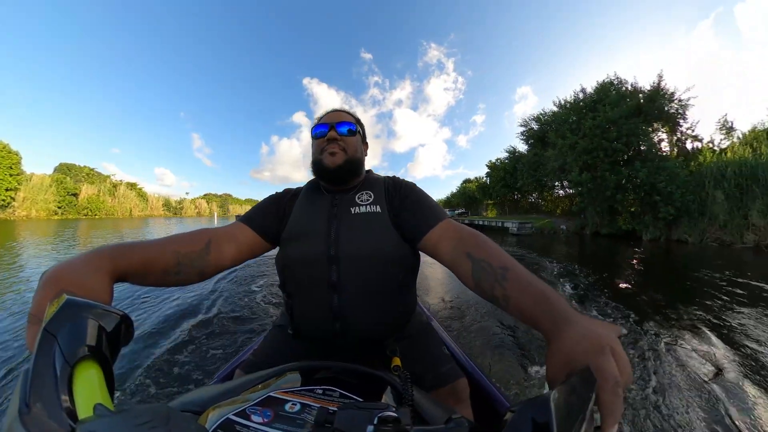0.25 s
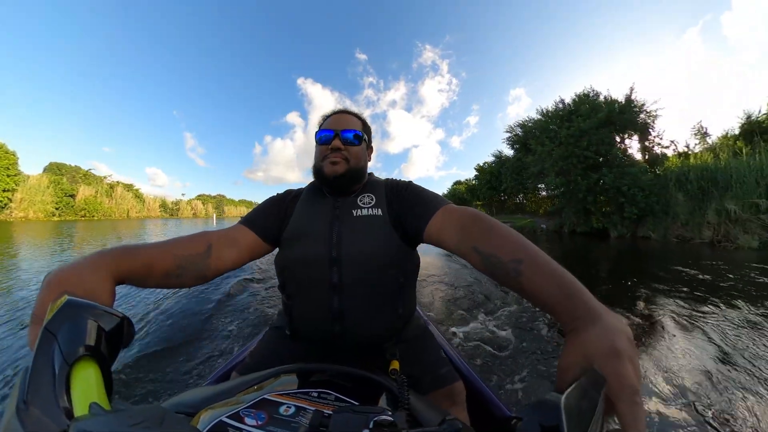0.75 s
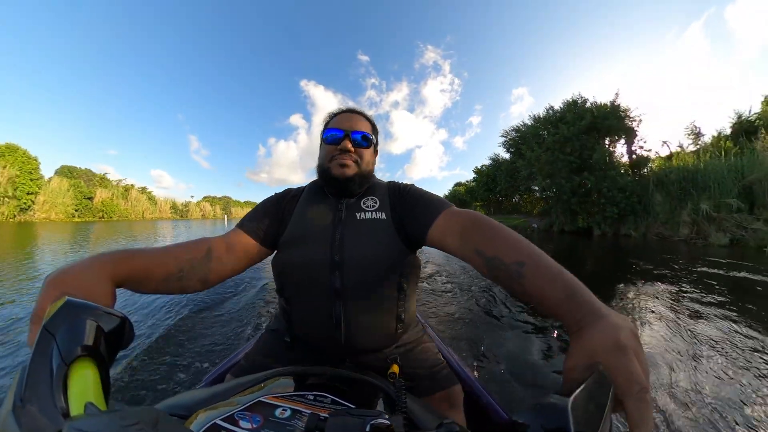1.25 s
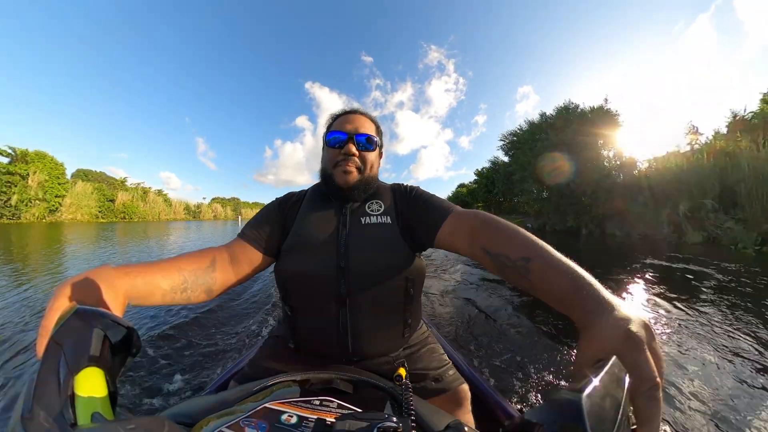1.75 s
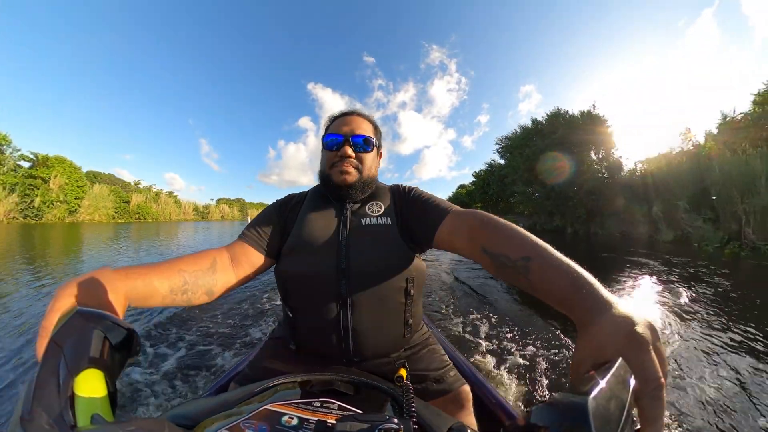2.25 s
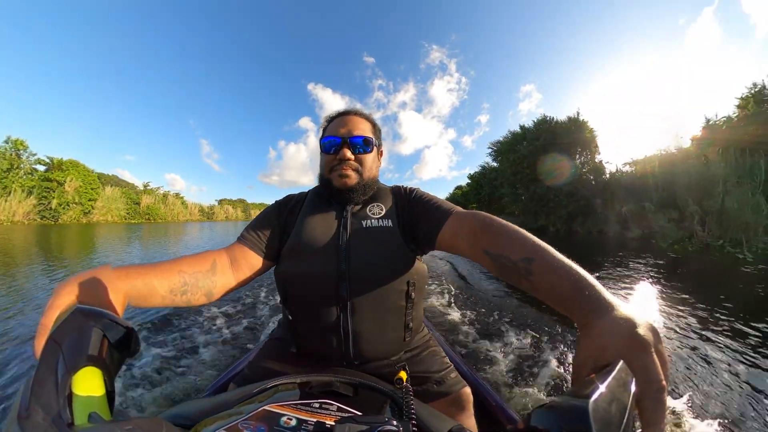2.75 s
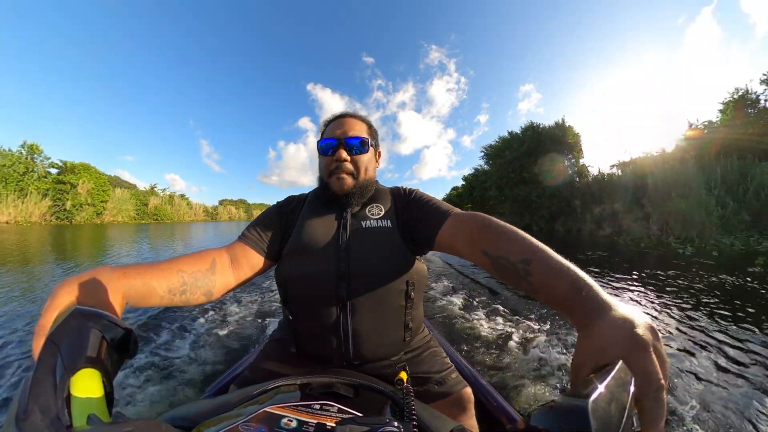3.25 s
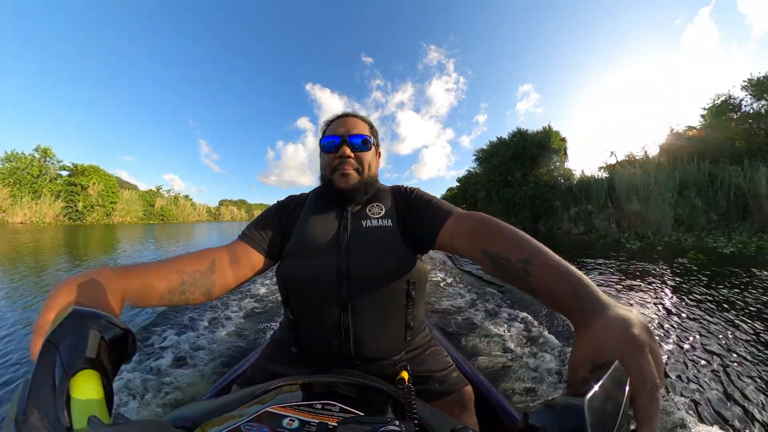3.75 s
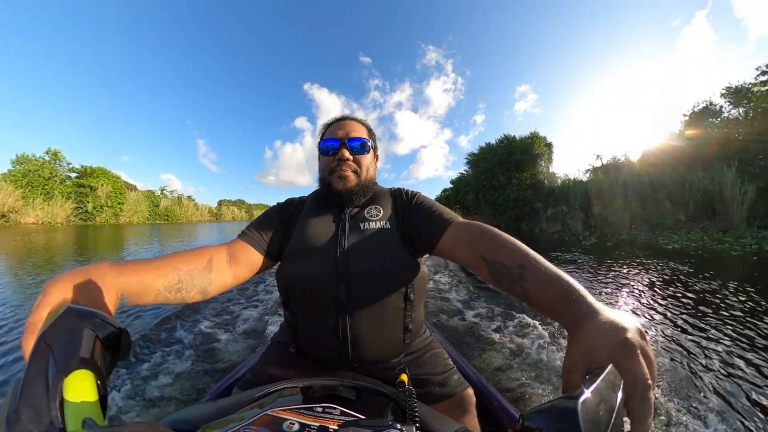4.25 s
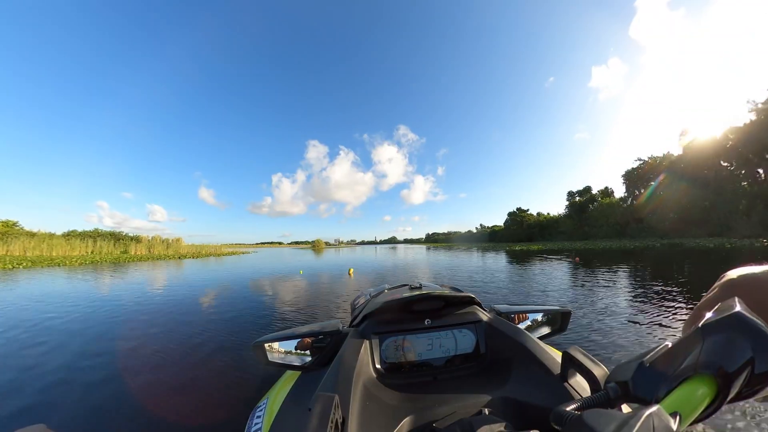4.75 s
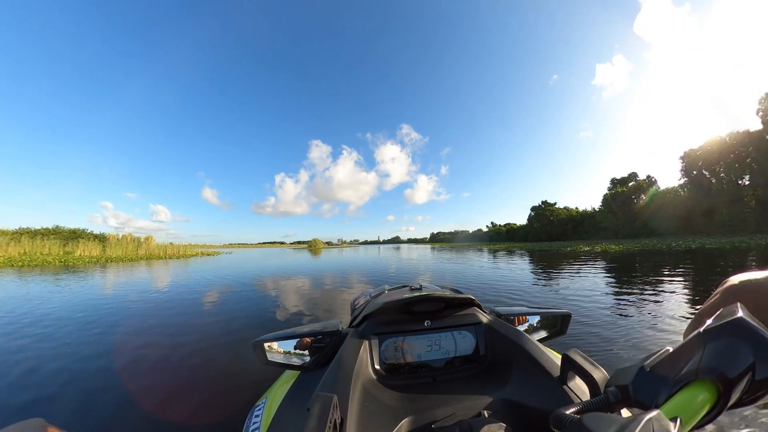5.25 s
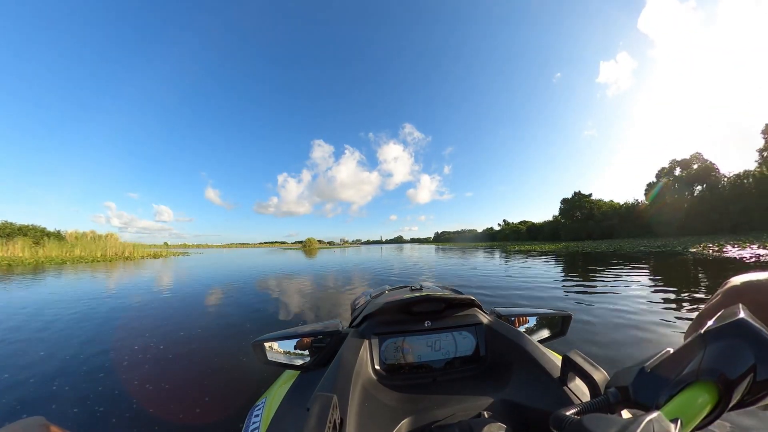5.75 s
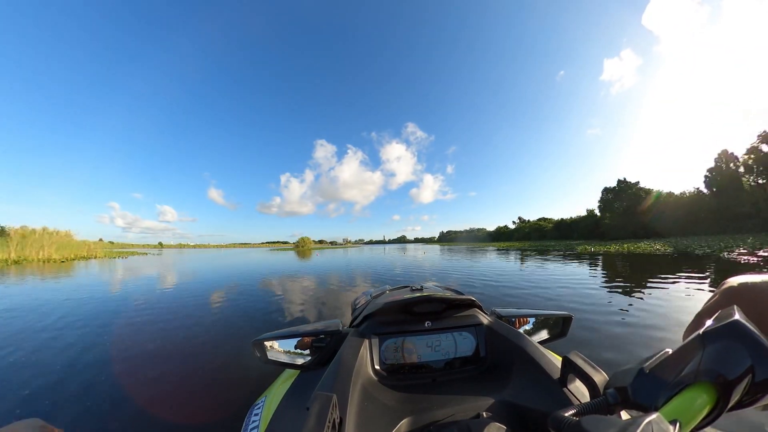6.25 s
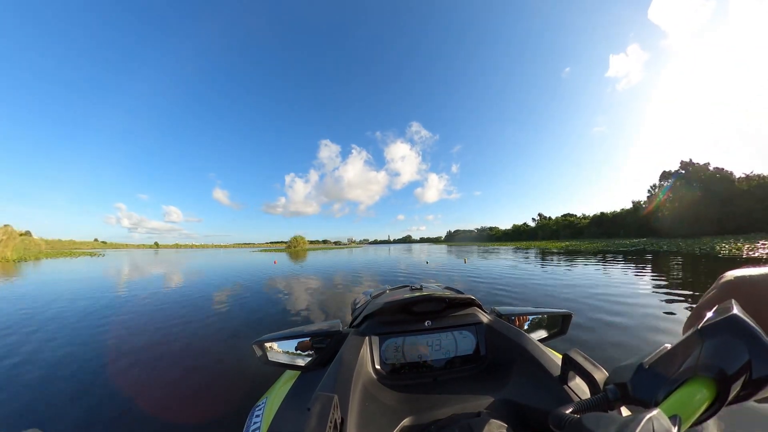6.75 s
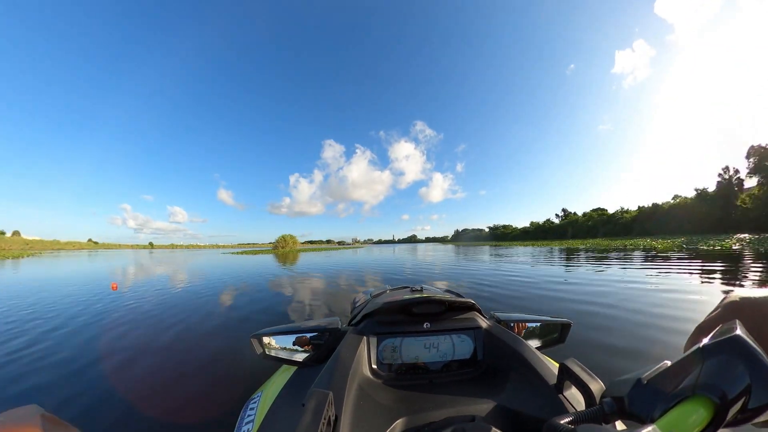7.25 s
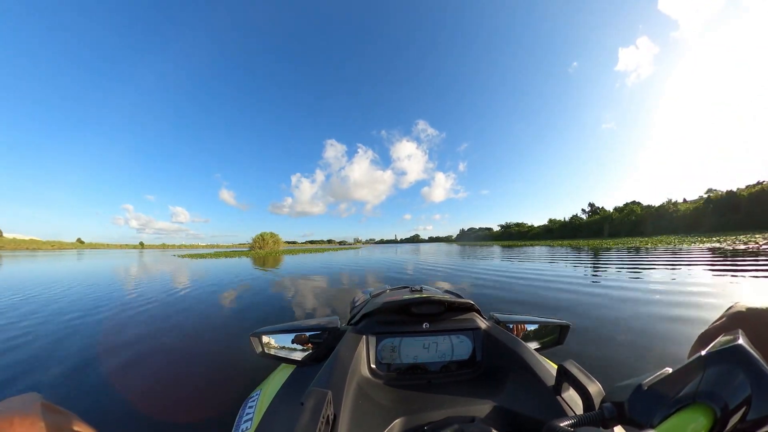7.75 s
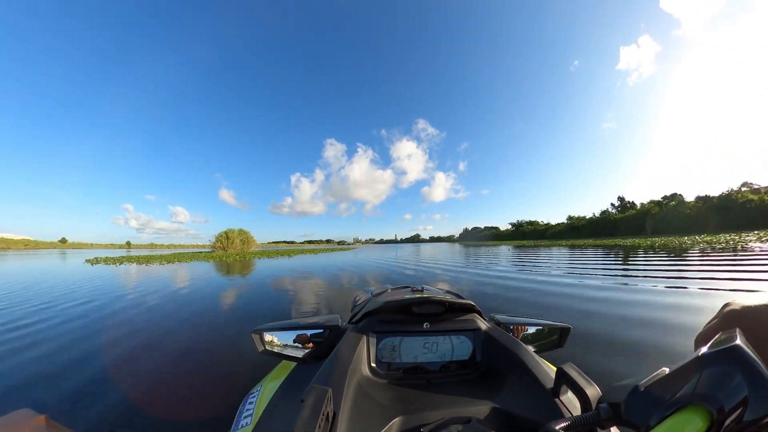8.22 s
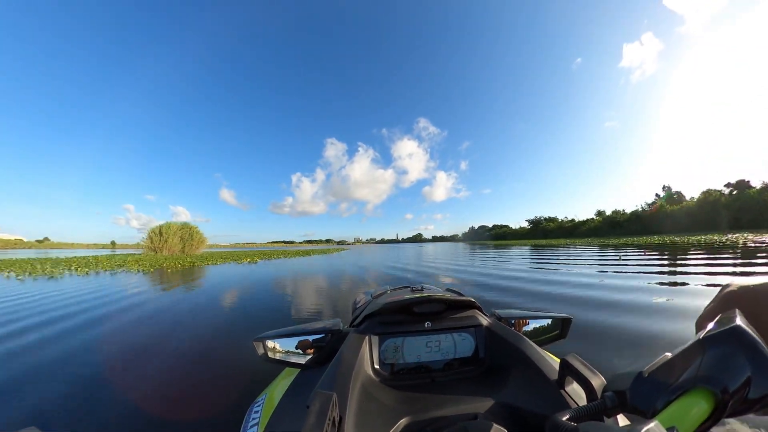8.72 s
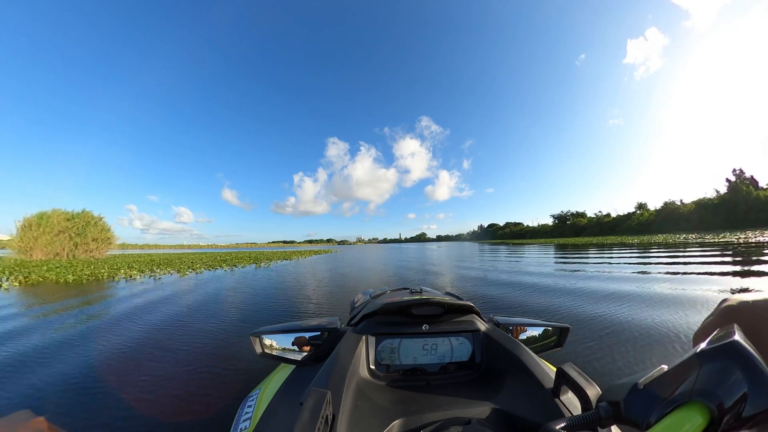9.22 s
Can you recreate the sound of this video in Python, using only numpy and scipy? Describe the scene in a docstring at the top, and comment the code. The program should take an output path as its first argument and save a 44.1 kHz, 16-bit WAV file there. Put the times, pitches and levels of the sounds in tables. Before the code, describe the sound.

A supercharged jet ski is heard from on board on a lake. For the first 3.7 seconds it cruises with a low, lumpy, burbling drone and a faint, warbling high whine, over hull rumble, churning water and slowly growing spray hiss. From about 3.7 seconds the engine rises in pitch with a push of throttle. At about 4.4 seconds a short click cuts this off, and the engine is back at cruising pitch with a smoother hum, while low, gusty wind buffets the microphone. Water keeps rushing and hissing. Near 6.9 seconds the engine steps up in pitch, then climbs steeply from about 7.6 to 8.3 seconds, with a surge of water and spray around 8.2 seconds. It then holds a loud, higher, steady drone at full speed, the whine thin and rough above it, until the end at about 9.5 seconds.

```python
"""Supercharged jet ski on a lake.

Heard on board in two scenes: facing astern, then, after a click, facing the bow. Exhaust and jet pump
drone on multiples of the engine cycle; the supercharger whines far above, warbling with the crank.
The craft cruises, then opens up to full speed. Water churns and spray hisses throughout.
Astern the hull rumbles; facing the bow, wind buffets the microphone."""
import sys
import numpy as np
from scipy import signal
from scipy.fft import rfft, irfft, next_fast_len
from scipy.io import wavfile
from scipy.ndimage import uniform_filter1d

SR = 44100
rng = np.random.default_rng(int(sys.argv[2]) if len(sys.argv) > 2 else 0)


def store_pcm(level_fs):
    """Save levels as 16-bit WAV."""
    pcm = np.round(np.clip(level_fs, -1, 1) * 32767).astype(np.int16)
    wavfile.write(sys.argv[1], SR, np.atleast_2d(pcm).T)


N = 418068
T = np.arange(N) / SR


def undb(db):
    """Decibels to gain."""
    return 10 ** (np.asarray(db) / 20)


def unit(x):
    """Scale to rms 1."""
    return x / np.sqrt(np.mean(x ** 2))


def curves(table):
    """Each column of a timed table at every sample."""
    times_s, *columns = np.transpose(table)
    return [np.interp(T, times_s, column) for column in columns]


def colour(x, spectrum):
    """Filter by (f/Hz, level/dB) points; rms 1."""
    hz, db = np.transpose(spectrum)
    size = next_fast_len(N, real=True)
    bins_hz = np.maximum(np.fft.rfftfreq(size, 1 / SR), 1)
    gain = undb(np.interp(np.log(bins_hz), np.log(hz), db, left=-np.inf, right=-np.inf))
    return unit(irfft(rfft(x, size) * gain, size)[:N])


def drift(rate_hz):
    """Smooth random drift, about rate_hz new values a second; rms 1."""
    size = max(int(SR / rate_hz), 2)
    held = np.repeat(rng.standard_normal(N // size + 2), size)
    start = rng.integers(size)
    smooth = uniform_filter1d(uniform_filter1d(held, size), size // 2)
    return unit(smooth[start:start + N])


def order_gains(table, speeds_hz, cycle_hz):
    """Yield each order (multiple of the cycle rate) and its gain at the running speed."""
    for order, *db in table:
        yield round(order), undb(np.interp(cycle_hz, speeds_hz, db))


def drone(cycle_phase, cycle_hz, resonances, order, swell_db, flutter, scatter):
    """Main exhaust note: swells as its pitch meets the pipe resonances; firings vary in strength."""
    level_db = np.interp(order * cycle_hz, *np.transpose(resonances)) + swell_db * drift(5)
    firing = 1 + flutter * drift(12) + scatter * drift(130)
    return undb(level_db) * firing * np.sqrt(2) * np.sin(order * cycle_phase)


def overtones(cycle_phase, partials, waver_db, smear_rad):
    """Further engine notes; water washing over the exhaust shifts the level and phase of each."""
    out = 0
    for order, gain in partials:
        phase = order * cycle_phase + rng.uniform(0, 2 * np.pi) + smear_rad * drift(14)
        out = out + gain * undb(waver_db * drift(8)) * np.sqrt(2) * np.sin(phase)
    return out


# Exhaust resonances: f/Hz, level/dB
STERN_PIPE = [(74, -22.5), (77.5, -21), (85, -21), (89, -23.5)]
# Low exhaust notes: t/s, level/dB at orders 6, 8, 9
BURBLE = [(0.0, -36, -30.5, -28.5), (0.9, -38.5, -34.5, -41.5), (1.9, -26.5, -41.5, -38.5),
          (3.0, -31.5, -46, -42.5), (3.76, -34.5, -44, -34.5), (3.86, -33.5, -36, -20.5),
          (4.35, -31, -30, -26)]
# Cycle rates at cruise, part throttle: f/Hz
STERN_SPEEDS_HZ = [25.8, 29.5]
# Exhaust and pump overtones: order, level/dB at each cycle rate
STERN_ORDERS = [(1, -32, -31), (4, -32, -24.5), (5, -37.5, -34.5), (7, -42, -36), (10, -46.5, -41.5),
                (11, -41.5, -54.5), (12, -39, -52), (14, -49, -49.5), (16, -52, -51), (18, -48, -52),
                (20, -47, -54.5), (27, -54.5, -62)]


def stern_engine(cycle_phase, cycle_hz):
    """Exhaust and jet pump astern: a low drone with a lumpy burble."""
    out = drone(cycle_phase, cycle_hz, STERN_PIPE, order=3, swell_db=0.95, flutter=0.06, scatter=0.14)
    burble = zip([6, 8, 9], undb(curves(BURBLE)))
    out += overtones(cycle_phase, burble, waver_db=1.7, smear_rad=0.13)
    partials = order_gains(STERN_ORDERS, STERN_SPEEDS_HZ, cycle_hz)
    return out + overtones(cycle_phase, partials, waver_db=2.0, smear_rad=0.47)


WHINE_ORDER = 105  # whine periods per engine cycle


def supercharger(cycle_phase, cycle_hz, tones, speeds_hz, twist_rad, jitter_rad, hiss, width_hz, gulp):
    """Rotor whine, bent by crank twist, pulsed by intake strokes; turbulence adds hiss round each tone."""
    warble = twist_rad * np.sin(2 * cycle_phase + drift(5.5) / 2)
    rotor_phase = WHINE_ORDER * cycle_phase + warble + jitter_rad * drift(25)
    out = 0
    for harmonic, sideband, *db in tones:
        harmonic, sideband = round(harmonic), round(sideband)
        phase = harmonic * rotor_phase + sideband * 6 * cycle_phase
        band_hz = harmonic * width_hz
        air = drift(band_hz) * np.sin(phase) + drift(band_hz) * np.cos(phase)
        gain = undb(np.interp(cycle_hz, speeds_hz, db))
        out = out + gain * unit(np.sin(phase) + hiss * harmonic * air)
    strokes = np.cos(cycle_phase) + np.sin(2 * cycle_phase) / 2 + np.cos(3 * cycle_phase) / 2
    return out * unit(1 + gulp * strokes)


# Cycle rates: f/Hz
STERN_WHINE_SPEEDS_HZ = [25, 25.33, 28.7, 29.5]
# Supercharger tones: harmonic, sideband, level/dB at each cycle rate
STERN_WHINE = [(1, 0, -68, -55.5, -51, -44), (2, 0, -60, -55.5, -57, -56), (3, 0, -74, -74, -78.5, -84.5)]


def stern_whine(cycle_phase, cycle_hz):
    """Supercharger astern: three warbling rotor harmonics."""
    return supercharger(cycle_phase, cycle_hz, STERN_WHINE, STERN_WHINE_SPEEDS_HZ,
                        twist_rad=0.47, jitter_rad=0.31, hiss=0.77, width_hz=170, gulp=0.13)


# Low rumble spectrum: f/Hz, level/dB
STERN_RUMBLE = [(10, -10.5), (22, -5.5), (50, -2), (120, -1.5), (200, -10.5), (320, -17.5), (600, -45.5)]


def hull_rumble(level_db=-26.5, waver_db=0.9):
    """Low hull noise, wavering slightly."""
    return undb(level_db) * colour(rng.standard_normal(N) * undb(waver_db * drift(11)), STERN_RUMBLE)


def churn(cycle_phase, spectrum, throb, surge_db):
    """Water torn up by the jet, pulsing with the shaft and the three impeller blades."""
    pulsing = 1 + throb * (np.cos(2 * cycle_phase) + np.cos(6 * cycle_phase))
    return colour(rng.standard_normal(N) * pulsing * undb(surge_db * drift(20)), spectrum)


# Spray spectrum: f/Hz, level/dB
SPRAY_SPECTRUM = [(600, -29.5), (1300, 3), (1900, 0), (2500, -3), (3100, -3), (4000, -8), (5000, -11.5),
                  (6300, -15), (7800, -23), (9000, -29.5), (11000, -37), (13000, -45), (16000, -64)]


def spray(drop_db, surge_db):
    """Dense droplets of very unequal size, thrown in sheets."""
    drops = rng.standard_normal(N) * undb(drop_db * rng.standard_normal(N))
    return colour(drops * undb(surge_db * drift(25)), SPRAY_SPECTRUM)


# Churn envelope: t/s, level/dB
STERN_SLOSH = [(0.0, -31), (0.45, -34), (0.85, -31), (2.2, -31.2), (2.65, -33), (3.6, -34.5), (4.35, -32.5)]
# Churn spectrum: f/Hz, level/dB
STERN_CHURN = [(120, -14.5), (260, 3.5), (450, -5.5), (650, -9.5), (1000, -11.5), (1400, -17),
               (1900, -30.5), (4000, -46.5)]


def stern_water(cycle_phase):
    """Churn sloshes, then calms as the hull lifts; spray grows with the wake."""
    slosh_db, = curves(STERN_SLOSH)
    spray_db = np.interp(T, [0, 2.93], [-50.5, -43])
    water = undb(slosh_db) * churn(cycle_phase, STERN_CHURN, throb=0.081, surge_db=0.67)
    return water + undb(spray_db) * spray(drop_db=4.0, surge_db=0.5)


# Fleck peaks: t/s, level/dB
FLECKS = [(1.06, -62), (2.03, -72)]
# Fleck spectrum: f/Hz, level/dB
FLECK_SPECTRUM = [(3000, -12), (7000, -1.5), (10000, -3), (13000, -13)]


def flecks(rise_fall_s=0.014):
    """Short soft spits of fine spray flying past."""
    envelope = sum(undb(db) * np.exp(-np.abs(T - peak_s) / rise_fall_s) for peak_s, db in FLECKS)
    return envelope * colour(rng.standard_normal(N), FLECK_SPECTRUM)


# Second whine harmonic, sets engine speed: t/s, f/Hz
STERN_WHINE_PITCH = [(0.06, 5294), (0.45, 5175), (0.59, 5430), (1.63, 5442), (1.77, 5265), (1.89, 5450),
                     (3.3, 5458), (3.37, 5352), (3.67, 5413), (3.9, 6001), (4.3, 6336)]


def facing_stern():
    """Cruise with a steady low hull rumble, then a first push of throttle."""
    whine_hz, = curves(STERN_WHINE_PITCH)
    cycle_hz = whine_hz / (2 * WHINE_ORDER)
    cycle_phase = 2 * np.pi * np.cumsum(cycle_hz) / SR
    engine = stern_engine(cycle_phase, cycle_hz) + stern_whine(cycle_phase, cycle_hz)
    return engine + hull_rumble() + stern_water(cycle_phase) + flecks()


# Cycle rates at cruise, part throttle, full throttle: f/Hz
BOW_SPEEDS_HZ = [25.6, 29.3, 35.3]
# Exhaust resonances: f/Hz, level/dB
BOW_PIPE = [(148, -19), (152, -17.5), (156, -14.5), (166, -12.5), (170, -18.5), (186, -23.5), (207, -12.3),
            (216, -9.5)]
# Low exhaust notes: t/s, level/dB at orders 8, 12
GROWL = [(4.4, -37, -29.5), (5.25, -26.5, -25.5), (5.75, -27.5, -30), (6.55, -33, -30), (6.9, -41, -42.5),
         (7.2, -39, -31.5), (8.0, -44.5, -38), (8.3, -43.5, -30.5)]
# Muffler gas spectrum: f/Hz, level/dB
MUFFLER_SPECTRUM = [(90, -24.5), (150, -1), (185, -1.5), (225, -1), (255, -15), (340, -32.5)]
# Exhaust and pump overtones: order, level/dB at each cycle rate
BOW_ORDERS = [(4, -38, -30.5, -27), (10, -52.5, -52, -52), (14, -41, -40.5, -48.5), (16, -36.5, -28, -35.5),
              (18, -51.5, -38, -28), (20, -53, -48.5, -49), (24, -58.5, -42, -51), (26, -47, -53.5, -56),
              (28, -56.5, -53.5, -57.5), (30, -51, -55.5, -46), (32, -47.5, -54, -55), (36, -56, -46, -58),
              (42, -61, -44, -56.5), (62, -55.5, -72, -73)]


def bow_engine(cycle_phase, cycle_hz):
    """Exhaust and jet pump heard forward: drone, growl and a roar that grows with gas flow."""
    roar_db = np.interp(cycle_hz, BOW_SPEEDS_HZ, [-34.5, -30, -23])
    swell_db = np.interp(cycle_hz, BOW_SPEEDS_HZ, [0.6, 1.8, 0.7])  # least steady at part throttle
    out = drone(cycle_phase, cycle_hz, BOW_PIPE, order=6, swell_db=swell_db, flutter=0.062, scatter=0.087)
    growl = zip([8, 12], undb(curves(GROWL)))
    out += overtones(cycle_phase, growl, waver_db=0.9, smear_rad=0.11)
    out += undb(roar_db) * colour(rng.standard_normal(N), MUFFLER_SPECTRUM)
    partials = order_gains(BOW_ORDERS, BOW_SPEEDS_HZ, cycle_hz)
    return out + overtones(cycle_phase, partials, waver_db=1.8, smear_rad=0.22)


# Cycle rates: f/Hz
BOW_WHINE_SPEEDS_HZ = [24.6, 25.24, 28.7, 34.34, 36]
# Supercharger tones: harmonic, sideband (rounded, steps of 6 orders), level/dB at each cycle rate
BOW_WHINE = [(1, 1, -68, -67.5, -67.5, -69, -64.5), (2, -1, -83, -79, -72, -67, -68),
             (2, 0, -57, -49, -49, -52.5, -67.5), (2, 1.3, -76, -65.5, -70, -65, -68),
             (2, 2, -91, -89.5, -89, -75, -73), (4, 0.019, -86, -80, -76.5, -120, -120)]


def bow_whine(cycle_phase, cycle_hz):
    """Supercharger heard forward: tones and sidebands, unsteady under full load."""
    blur = np.interp(cycle_hz, BOW_SPEEDS_HZ, [0.28, 0.32, 0.75])
    return supercharger(cycle_phase, cycle_hz, BOW_WHINE, BOW_WHINE_SPEEDS_HZ,
                        twist_rad=0.5, jitter_rad=blur, hiss=blur, width_hz=150, gulp=0.22)


# Wind envelope: t/s, level/dB
BOW_GUSTS = [(4.36, -23.5), (4.8, -17), (6.8, -19.5), (7.55, -15.5), (7.95, -17.5), (8.4, -21),
             (9.48, -22.5)]
# Wind spectrum: f/Hz, level/dB
BOW_WIND = [(10, -20), (22, -5.5), (50, 0.5), (120, -5.5), (200, -9), (280, -15), (600, -32)]


def bow_wind(gust_db=1.4):
    """Eddies buffet the microphone."""
    wind_db, = curves(BOW_GUSTS)
    return undb(wind_db) * colour(rng.standard_normal(N) * undb(gust_db * drift(11)), BOW_WIND)


# Flow past the hull: t/s, level/dB re cruise
BOW_FLOW = [(4.36, -3.5), (4.7, -0.5), (5.7, -1), (6.4, 0.6), (7.9, 1.5), (8.17, 6), (8.45, 4), (9.48, 3)]
# Churn spectrum: f/Hz, level/dB
BOW_CHURN = [(120, -16), (300, 0.5), (470, -0.5), (700, -4.5), (1000, -9), (1250, -10), (1800, -31),
             (4000, -49)]


def bow_water(cycle_phase):
    """Water rushing past the hull drives both churn and spray."""
    flow_db, = curves(BOW_FLOW)
    water = undb(-32 + flow_db) * churn(cycle_phase, BOW_CHURN, throb=0.05, surge_db=0.58)
    return water + undb(-44.5 + 1.08 * flow_db) * spray(drop_db=2.5, surge_db=0.43)


# Engine cycle rate: t/s, f/Hz
BOW_CYCLE_RATE = [(4.36, 24.43), (4.66, 25.02), (5.64, 25.64), (6.3, 25.41), (6.81, 26.05), (6.97, 28.01),
                  (7.6, 28.75), (7.94, 31.03), (8.14, 34.6), (8.31, 35.78), (8.57, 36.04), (9.48, 36.04)]


def facing_bow():
    """A smooth hum climbs to a loud high drone at full throttle."""
    cycle_hz, = curves(BOW_CYCLE_RATE)
    cycle_phase = 2 * np.pi * np.cumsum(cycle_hz) / SR
    engine = bow_engine(cycle_phase, cycle_hz) + bow_whine(cycle_phase, cycle_hz)
    return engine + bow_wind() + bow_water(cycle_phase)


def scene():
    """The bow scene fades in under the stern scene, which stops dead with a click."""
    fade_start_s, switch_s = 3.69, 4.3547
    click_db, click_decay_s = -17, 0.0006
    bow_gain = np.interp(T, [fade_start_s, switch_s], [0, 1]) ** 2
    stern_gain = np.clip((switch_s - T) / 0.001, 0, 1)
    click = undb(click_db) * (T >= switch_s) * np.exp(-np.abs(T - switch_s) / click_decay_s)
    mix = facing_stern() * stern_gain + click + facing_bow() * bow_gain
    edge_fade = np.minimum(np.minimum(T, T[-1] - T) / 0.003, 1)
    return (edge_fade * mix)[None]


def record(dry):
    """Round the highest peaks and cut the top of the treble."""
    cutoff_hz = 13600
    rounded = dry - 0.18 * dry ** 3
    lowpass = signal.ellip(8, 0.2, 80, cutoff_hz, fs=SR, output="sos")
    return signal.sosfilt(lowpass, rounded)


dry = scene()
out = record(dry)
store_pcm(out)
```